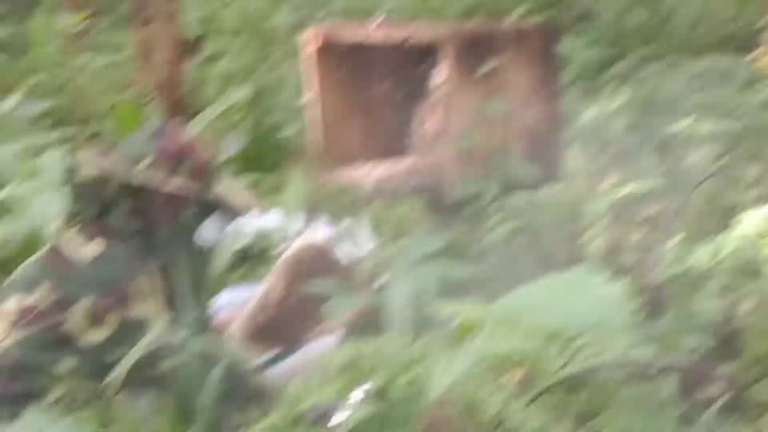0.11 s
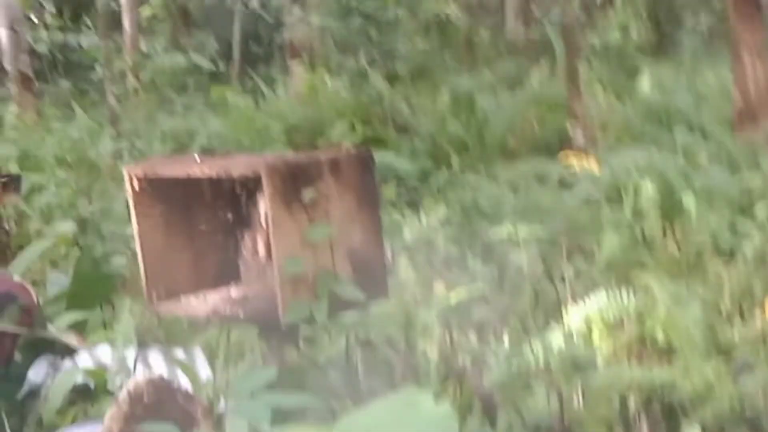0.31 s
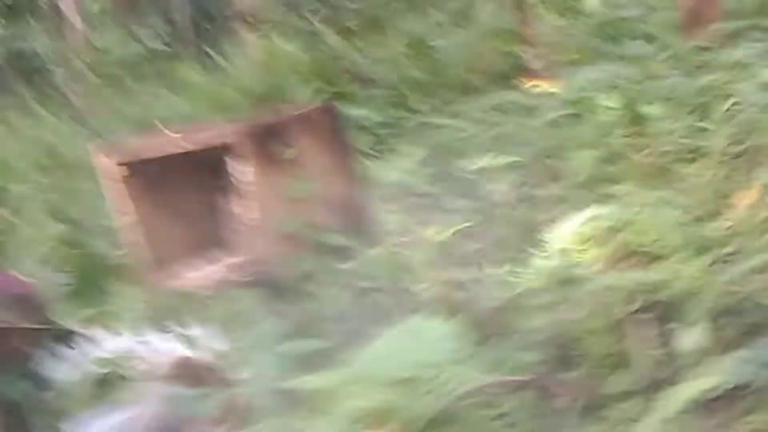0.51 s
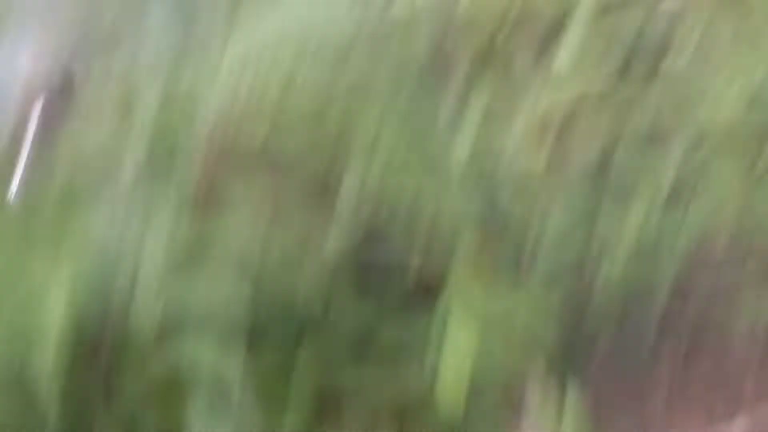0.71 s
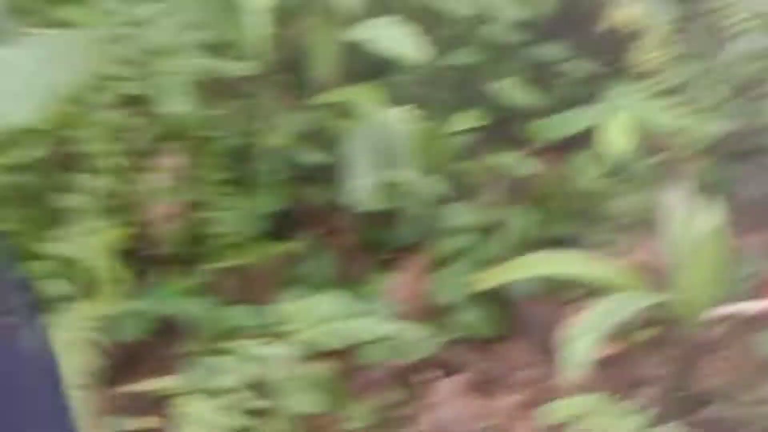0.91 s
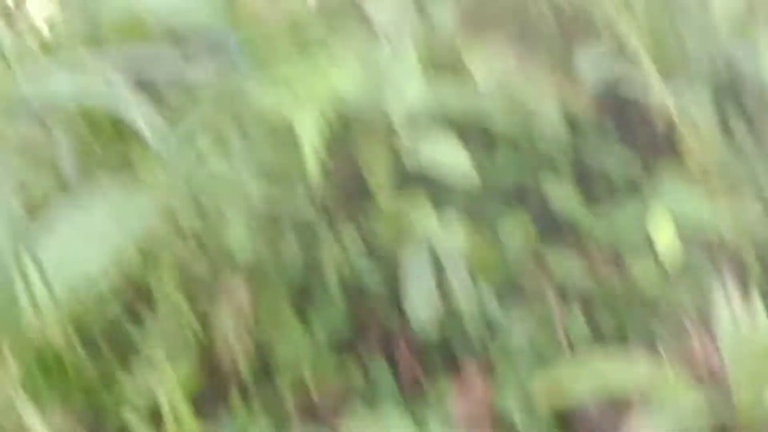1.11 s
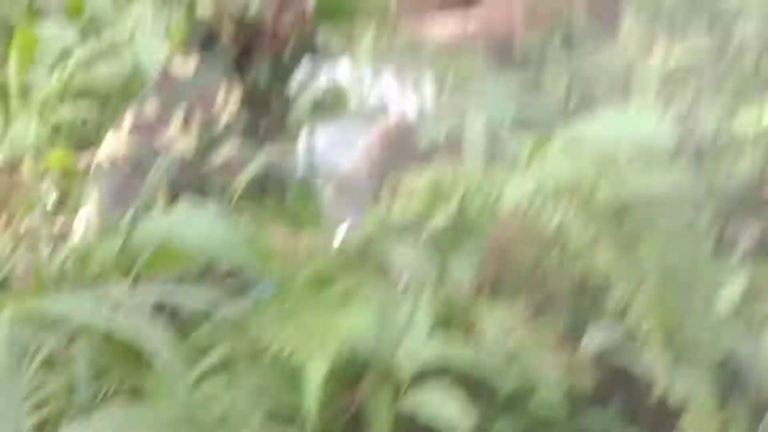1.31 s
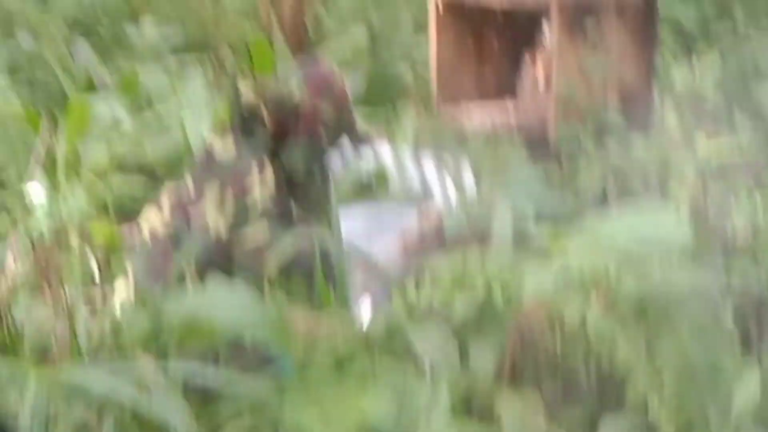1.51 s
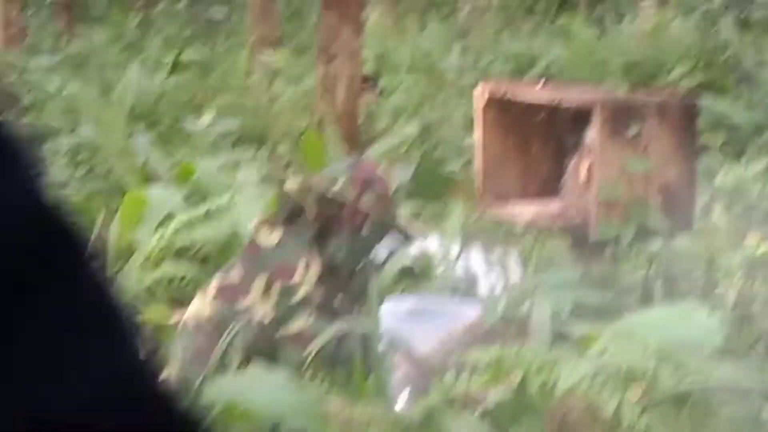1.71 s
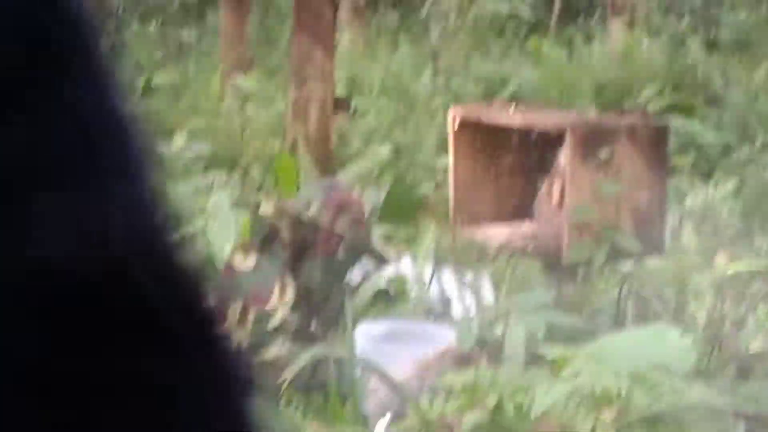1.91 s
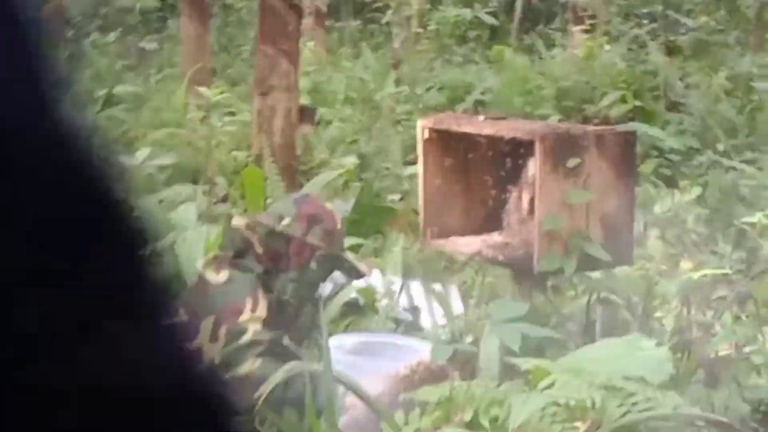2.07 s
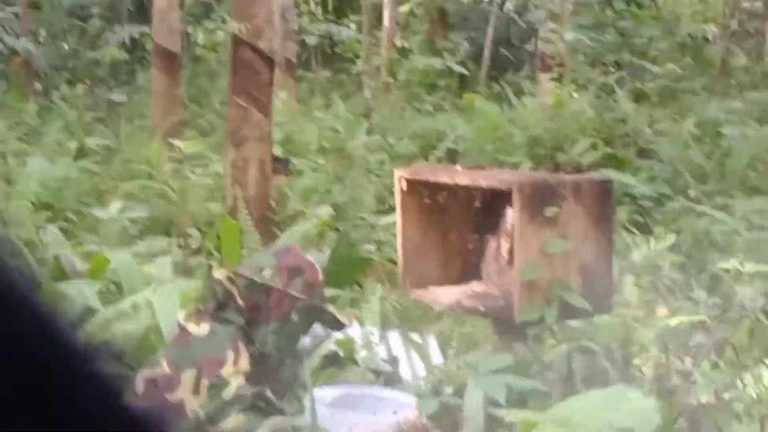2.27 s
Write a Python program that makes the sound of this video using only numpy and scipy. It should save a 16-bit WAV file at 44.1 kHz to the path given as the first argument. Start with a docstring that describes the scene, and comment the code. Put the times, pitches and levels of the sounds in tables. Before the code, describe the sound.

A close bee hums and fades over a faint swarm, with one loud scrape and leafy rustling.

```python
"""A forest with an opened hive of honey bees, heard from a hand-held camera that swings through the undergrowth.
One bee buzzes close by on unsteady wingbeat overtones and airy noise, over a faint swarm of the same voices.
Noise grains make leaves and sleeve rustle, scrape and rumble; struck modes make the bumps, knocks and catches.
A low buzz swells about three times a second. Behind it lie air, fluttering bands of insect whine,
a far snap of fading noise and a thin call on a wavering sine."""
import sys
import numpy as np
from scipy.fft import rfft, irfft, next_fast_len
from scipy.io import wavfile
from scipy.ndimage import uniform_filter1d, minimum_filter1d, map_coordinates

SR = 44100
rng = np.random.default_rng(int(sys.argv[2]) if len(sys.argv) > 2 else 0)


def generate_wav(signal):
    """Clip the signal to [-1, 1] and save it as 16-bit WAV at the path in sys.argv[1]."""
    frames = np.transpose(np.atleast_2d(signal))
    scaled = np.clip(frames, -1, 1) * 32767
    pcm = np.round(scaled).astype(np.int16)
    wavfile.write(sys.argv[1], SR, pcm)


N = 101430  # length in samples


def amp(db):
    """Decibels to gain."""
    return 10 ** (np.asarray(db) / 20)


def unit(x):
    """Scale to rms 1."""
    return x / np.sqrt(np.mean(x ** 2) + 1e-20)


def clock():
    """The time of every sample, in seconds."""
    return np.arange(N) / SR


def along(points, hz):
    """Read (frequency [Hz], value) points on a log frequency axis."""
    f, v = np.transpose(points)
    return np.interp(np.log(hz + 1), np.log(f + 1), v)


def curve(rows):
    """Join (time [s], value) points by straight lines."""
    return np.interp(clock(), *np.transpose(rows))


def wobble(rate):
    """A smooth random curve through `rate` random knots a second."""
    knots = rng.standard_normal(4096)
    return map_coordinates(knots, [clock() * rate], mode="wrap")


def sway(rate):
    """A smooth random curve that stays between -1 and 1."""
    return np.tanh(wobble(rate))


def filtered(x, response):
    """Shape the spectrum of x by a response given as a function of Hz."""
    padded = next_fast_len(N + SR // 2)
    spectrum = rfft(x, padded) * response(np.fft.rfftfreq(padded, 1 / SR))
    return irfft(spectrum, padded)[..., :N]


def grains(tone, spiky_db):
    """Dense tiny slips of random size, coloured by the tone; rms 1."""
    slips = rng.standard_normal(N) * amp(spiky_db * wobble(1200))
    return unit(filtered(slips, lambda hz: amp(along(tone, hz))))


def band(centre_hz, width_hz):
    """Noise in one resonance, width_hz between its half-power points; rms 1."""
    noise = rng.standard_normal(N)
    return unit(filtered(noise, lambda hz: 1 / (1 + (2 * (hz - centre_hz) / width_hz) ** 4) ** .5))


def swell(peak, rise, fall, steep=2):
    """A bell-shaped envelope, flatter on top when steep."""
    t = clock() - peak
    return np.exp(-.5 * np.abs(t / np.where(t < 0, rise, fall)) ** steep)


def ring(start, modes, attack):
    """Struck modes (frequency [Hz], level [dB], t60 [s]) that die away exponentially."""
    t = np.maximum(clock() - start, 0)
    tones = sum(amp(db - 60 * t / t60) * np.sin(2 * np.pi * hz * t) for hz, db, t60 in modes)
    return tones * (1 - np.exp(-t / attack))


def strokes(rows):
    """Soft-edged contact from (start [s], end [s], level [dB]) rows."""
    t, edge_s = clock(), 0.011
    return sum(amp(db) * (np.tanh((t - start) / edge_s) - np.tanh((t - end) / edge_s)) / 2
               for start, end, db in rows)


def wings(pitch_hz, tone, flicker_db, count):
    """Fundamental and overtones of an unsteady wingbeat; higher overtones smear more as the bee turns."""
    jitter, smear = .006, .13  # relative pitch; radians per harmonic number
    phase = 2 * np.pi * np.cumsum(pitch_hz * (1 + jitter * wobble(130))) / SR
    parts = []
    for k in range(1, count + 1):
        gain = amp(along(tone, k * pitch_hz.mean()) + flicker_db * sway(34.86))
        offset = 2 * np.pi * rng.random()
        parts.append(gain * np.sin(k * phase + offset + smear * k * wobble(90)))
    return parts[0], sum(parts[1:])


# The close bee's wingbeat: (time [s], pitch [Hz])
BEE_PITCH = [(0, 279.2), (.06, 287.4), (.11, 275), (.18, 267.8), (.25, 272.5), (.33, 266.1), (.39, 288.7),
             (.43, 276.7), (.5, 263.6), (.55, 277.8), (.62, 292), (.72, 284)]
# Its loudness as it nears and turns: (time [s], fundamental level [dB], overtone level [dB])
BEE_LOUDNESS = [(0, -56, -57.5), (.035, -90, -56.5), (0.057, -44, -46), (.08, -37, -43.5), (.1, -54.5, -47),
                (.125, -51, -46.5), (.18, -51, -49), (.22, -55, -55.5), (.33, -63, -52.5),
                (.41, -47, -45.5), (.47, -58, -52), (.51, -50.5, -52.5), (.54, -57, -43), (.58, -61, -55),
                (.7, -62, -67.5), (0.852, -91, -75)]
# Its voice: (frequency [Hz], level of a harmonic there [dB])
BEE_VOICE = [(550, -4), (820, -5.5), (1100, -14.5), (1400, -14), (1700, -11), (2000, -10.5), (2300, -10),
             (2700, -12), (3300, -2), (4000, -16), (5000, -40), (8000, -17)]
# The rough, airy part of its buzz: (frequency [Hz], level per Hz [dB])
BEE_AIRINESS = [(150, -17), (400, -6), (900, -12), (1900, -14), (2700, -1), (3300, 2), (4300, -19),
                (7000, -32.5)]


def close_bee():
    """A bee hovers by the microphone and leaves: wingbeat hum, overtones and rough air noise."""
    times, hum_db, buzz_db = np.transpose(BEE_LOUDNESS)
    hum, overtones = wings(curve(BEE_PITCH), BEE_VOICE, flicker_db=8.5, count=26)
    hiss = amp(-5.5) * grains(BEE_AIRINESS, spiky_db=2.5)  # set against the overtones
    buzz = unit(overtones) + hiss
    hum_gain = amp(np.interp(clock(), times, hum_db))
    buzz_gain = amp(np.interp(clock(), times, buzz_db))
    return hum_gain * unit(hum) + buzz_gain * buzz


# The farther bees' voice: (frequency [Hz], level of a harmonic there [dB])
SWARM_VOICE = [(270, -4), (550, -3), (850, -16), (1100, -23.5), (1400, 7.5), (1700, -1), (2000, -15),
               (2700, -17), (3300, -2.5), (4500, -12)]
# Nearness of the swarm: (time [s], level on top of the base level [dB])
SWARM_NEARNESS = [(0, -1.5), (.35, 7.5), (.7, 2), (.85, 6), (1.15, -6.5), (1.6, -1.5), (1.9, -5.5),
                  (2.3, -10)]


def swarm(count):
    """Farther bees wander in pitch and flit in and out of earshot."""
    mean_hz, spread, base_db = 280.2, .07, -63.5  # spread is relative to the mean wingbeat
    bees = 0
    for _ in range(count):
        pitch_hz = mean_hz * (1 + spread * wobble(9))
        voice = sum(wings(pitch_hz, SWARM_VOICE, flicker_db=9.5, count=14))
        bees = bees + amp(13.5 * sway(13)) * voice
    return amp(base_db + curve(SWARM_NEARNESS)) * unit(bees)


# Low buzzing swells: (centre [s], half length [s], level [dB], pitch [Hz])
BUZZ_SWELLS = [(0.316, 0.025, -45, 230), (0.395, .022, -48.5, 220), (0.658, 0.06, -55.5, 200),
               (0.989, 0.024, -46, 227.5), (1.304, 0.015, -45, 210), (1.338, .02, -52.5, 230),
               (1.618, 0.015, -46.5, 237.4), (1.669, .022, -45.5, 204.4), (1.952, 0.029, -47, 235),
               (2.235, 0.018, -49.5, 226), (2.28, 0.01, -49, 224.3)]


def low_buzz():
    """A dull, rough buzz, part wavering tone and part narrow noise, that swells and fades."""
    rough = 0.75  # share of the power that is noise
    out = np.zeros(N)
    for centre, half, db, hz in BUZZ_SWELLS:
        tone = 2 ** .5 * np.sin(2 * np.pi * np.cumsum(hz * (1 + 0.058 * wobble(60))) / SR)
        buzz = (1 - rough) ** .5 * tone + rough ** .5 * band(hz, width_hz=82)
        out += amp(db) * swell(centre, half, half) * buzz
    return out


# Fine fizz, for scrapes and for leaves brushing past: (frequency [Hz], level per Hz [dB])
FIZZ_COLOUR = [(1000, -21), (4000, -6.5), (7000, 6), (8500, 0.5), (9500, -15), (11000, -5.5), (12500, -4),
               (14000, 0), (16000, -6)]
# Short scrapes across the microphone:
# (peak [s], rise [s], fall [s], body level [dB], hollow ring level [dB], fizz level [dB])
SCRAPE_EVENTS = [(0.24, 0.018, 0.011, -35.5, -43.5, -37.5), (.456, 0.0073, 0.0068, -10, -24.5, -24),
                 (.843, 0.0095, 0.0099, -35, -64, -44.5)]
# Body of the scrapes: (frequency [Hz], level per Hz [dB])
SCRAPE_COLOUR = [(200, -37), (1500, -29), (2300, -17), (2900, -4.5), (3500, 1), (4300, -6), (5200, -8.5),
                 (6800, -10.5), (8500, -36), (10500, -54), (13000, -37), (16000, -40)]
# Hollow ring of the scrapes: (frequency [Hz], level per Hz [dB])
HOLLOW_COLOUR = [(200, -30), (600, -14.5), (850, -4), (1050, -3.5), (1350, 0), (1800, -11.5), (3000, -32)]
# Sharp catches in the rubbing: (time [s], level [dB])
CATCHES = [(.4513, -8), (0.454, -1), (.4555, 2), (0.4622, 1), (.917, -33.5), (1.3955, -33), (1.4045, -36.5),
           (1.508, -28.5), (1.6755, -34)]
# Ringing modes of the case: (frequency [Hz], level against the catch [dB], t60 [s])
CASE_MODES = [(3463, -3, 0.012), (3660, 0.5, .012), (5100, -1, 0.0084), (6600, -25, 0.0046),
              (7700, -35, 0.001), (13474, -12, .003)]


def scraping():
    """Stick-slip scrapes across the case, with sharp catches that ring its modes."""
    body = grains(SCRAPE_COLOUR, spiky_db=2.0)
    hollow = grains(HOLLOW_COLOUR, spiky_db=-0.5)
    fizz = grains(FIZZ_COLOUR, spiky_db=-3)
    scrapes = 0
    for peak, rise, fall, body_db, hollow_db, fizz_db in SCRAPE_EVENTS:
        mix = amp(body_db) * body + amp(hollow_db) * hollow + amp(fizz_db) * fizz
        scrapes = scrapes + swell(peak, rise, fall, steep=3.46) * mix
    catches = sum(amp(db) * ring(start, CASE_MODES, attack=0.00041) for start, db in CATCHES)
    return scrapes + catches


# Light rustle of leaves and sleeve: (time [s], level [dB])
RUSTLE_LEVEL = [(0, -49), (.1, -47), (.2, -43.5), (.27, -43.5), (.31, -48.5), (.38, -49), (.43, -39),
                (.48, -50), (.6, -47.5), (.68, -50.5), (.77, -51.5), (.92, -45.5), (1, -47.5), (1.22, -51),
                (1.38, -48.5), (1.51, -40), (1.6, -44.5), (1.72, -50.5), (1.82, -64), (2.3, -70)]
# Its colour: (frequency [Hz], level per Hz [dB])
RUSTLE_COLOUR = [(100, -30), (900, -38), (2300, -18.5), (3000, -1.5), (3600, 2), (4700, -9.5), (6000, -7),
                 (8300, -11), (9200, -22), (11300, -26.5), (13000, -17), (15500, -18)]
# Long rubs of cloth over the case: (start [s], end [s], level [dB])
CLOTH_RUBS = [(.29, .34, -50.5), (0.34, 0.435, -46), (0.528, 0.554, -48), (.585, .615, -47),
              (1.393, 1.48, -67.5), (1.485, 1.535, -49.5), (1.535, 1.618, -47.5), (1.619, 1.699, -42)]
# Their colour: (frequency [Hz], level per Hz [dB])
RUB_COLOUR = [(100, -28), (600, -13), (900, -5.5), (1400, 2), (2400, 1.5), (3600, 6), (5000, 2), (8200, 6),
              (9500, -10.5), (11500, -7.5), (13500, -1), (16000, -11)]
# Leaves brushing past with a fine hiss: (start [s], end [s], level [dB])
LEAF_BRUSHES = [(.11, .33, -58.5), (1.39, 1.63, -50)]


def rustle():
    """Leaves and cloth slide past as the camera swings, each a stream of tiny slips."""
    light_gain = amp(curve(RUSTLE_LEVEL) + 0.43 * wobble(45.6))
    light = light_gain * grains(RUSTLE_COLOUR, spiky_db=1.5)
    rubs = strokes(CLOTH_RUBS) * amp(2.2 * wobble(80)) * grains(RUB_COLOUR, spiky_db=2.5)
    brushes = strokes(LEAF_BRUSHES) * grains(FIZZ_COLOUR, spiky_db=7.0)
    return light + rubs + brushes


# Soft bumps of the hand: (time [s], level [dB], pitch [Hz])
HAND_BUMPS = [(0.242, -38.5, 128), (.298, -33.5, 196), (0.317, -51, 155), (.392, -45, 150),
              (.695, -32, 128.1), (0.794, -29.5, 145), (0.851, -41, 116), (0.954, -37.5, 108.5),
              (1.151, -35.5, 135), (1.41, -50, 102)]
# Modes of every bump: (ratio to its pitch, level against the bump [dB], t60 [s])
BUMP_RESONANCES = [(.65, -4.5, .11), (1, 8.5, 0.047), (1.65, -1.5, 0.069)]
# Small hollow knocks of the case: (time [s], level [dB], pitch [Hz], t60 [s])
CASE_KNOCKS = [(.2335, -23.5, 870, 0.027), (.298, -31.5, 460.3, 0.033)]
# Dull rumble of the grip shifting: (start [s], end [s], level [dB])
GRIP_SHIFTS = [(.235, .435, -49), (.49, .67, -58), (.67, 1.11, -71)]
# Its colour: (frequency [Hz], level per Hz [dB])
GRIP_COLOUR = [(30, -32), (70, -1.5), (130, 1), (220, 0.5), (400, -11.5), (700, -13.5), (1200, -11),
               (2500, -33)]


def handling():
    """The hand bumps and knocks damped modes of the camera, and its grip rumbles as it shifts."""
    bumps = 0
    for start, db, hz in HAND_BUMPS:
        modes = [(hz * ratio, level, t60) for ratio, level, t60 in BUMP_RESONANCES]
        bumps = bumps + amp(db) * ring(start, modes, attack=0.0077)
    knocks = sum(ring(start, [(hz, db, t60)], attack=.0012) for start, db, hz, t60 in CASE_KNOCKS)
    return bumps + knocks + strokes(GRIP_SHIFTS) * grains(GRIP_COLOUR, spiky_db=3.5)


# Forest insects: (centre [Hz], width [Hz], level [dB], flutter depth [dB])
INSECT_BANDS = [(7910, 790, -56, 0.9), (3440, 600, -61, -3.6), (1394, 300, -79, 3)]


def insect_whine():
    """Constant insect song as narrow noise bands, each fluttering in level."""
    return sum(amp(db + flutter_db * sway(12)) * band(hz, width)
               for hz, width, db, flutter_db in INSECT_BANDS)


# The snap's colour: (frequency [Hz], level per Hz [dB])
SNAP_COLOUR = [(80, -35), (300, -13), (800, -17), (1080, -3), (1400, -16), (1900, 4), (2500, -2),
               (4200, -1), (5500, -16), (8000, -21)]


def far_snap():
    """Something snaps far off among the trees: quick-rising noise that decays."""
    start_s, level_db, t60_s, attack_s = 1.747, -40.5, 0.18, 0.0071
    t = np.maximum(clock() - start_s, 0)
    envelope = amp(level_db - 60 * t / t60_s) * (1 - np.exp(-t / attack_s))
    return envelope * grains(SNAP_COLOUR, spiky_db=-2.0)


# A thin far call: (time [s], level [dB])
CALL_LEVEL = [(1.77, -86), (1.805, -55.5), (1.825, -55), (1.838, -73), (1.88, -62), (1.91, -65),
              (1.99, -69), (2.15, -79), (2.3, -74)]


def thin_call():
    """A far, thin whistle: one sine with a wavering pitch."""
    pitch_hz = 4510 + 35 * wobble(160)
    return amp(curve(CALL_LEVEL)) * unit(np.sin(2 * np.pi * np.cumsum(pitch_hz) / SR))


# Still air of the forest: (frequency [Hz], level per Hz [dB])
AIR_COLOUR = [(30, -23), (150, 1), (260, -4), (450, -1), (700, -5.5), (1100, -1), (2300, -5), (3700, -1),
              (4400, -4), (5000, -6), (5700, 3.5), (6800, 1), (8400, 5), (9300, -8.5), (11500, -3.5),
              (15500, 1.5)]


def still_air():
    """A constant bed of coloured noise."""
    return amp(-60) * grains(AIR_COLOUR, spiky_db=3.0)


def scene():
    """Everything reaches one microphone, so both channels are alike."""
    bees = close_bee() + swarm(count=7) + low_buzz()
    contact = scraping() + rustle() + handling()
    background = insect_whine() + far_snap() + thin_call() + still_air()
    mono = bees + contact + background
    return np.array([mono, mono])


def record(dry):
    """The camera thins the bass, ducks around peaks and keeps nothing above its band limit."""
    bass_hz, top_hz = 55.6, 16150
    ceiling, look_s, hold_s = 0.5, 0.019, 0.0078  # limiter: of full scale, look-ahead, hold
    thinned = filtered(dry, lambda hz: (1j * hz / (bass_hz + 1j * hz)) ** 2)
    needed = np.minimum(1, ceiling / (np.abs(thinned[0]) + 1e-9))
    held = minimum_filter1d(needed, int((look_s + hold_s) * SR))
    held = np.roll(held, int((hold_s - look_s) * SR / 2))  # duck ahead of each peak
    gain = uniform_filter1d(held, size=64)
    return filtered(thinned * gain, lambda hz: hz < top_hz)


dry = scene()
out = record(dry)
generate_wav(out)
```